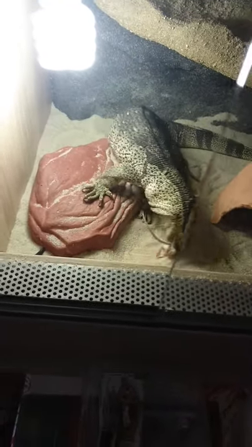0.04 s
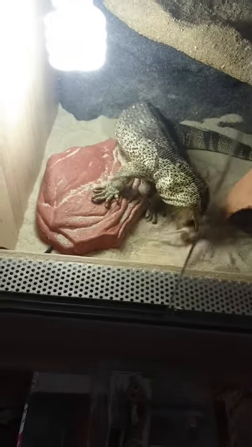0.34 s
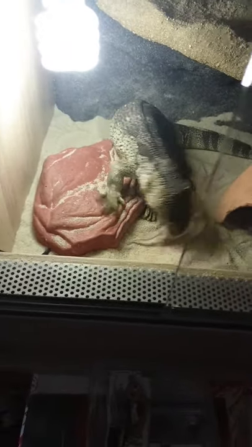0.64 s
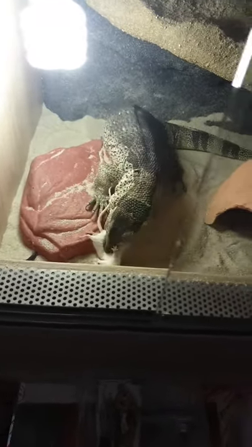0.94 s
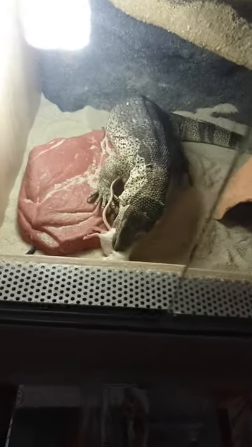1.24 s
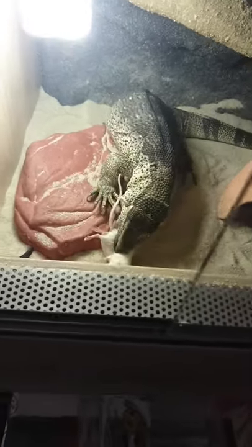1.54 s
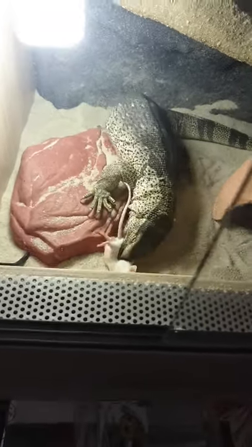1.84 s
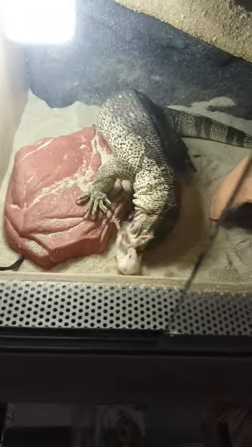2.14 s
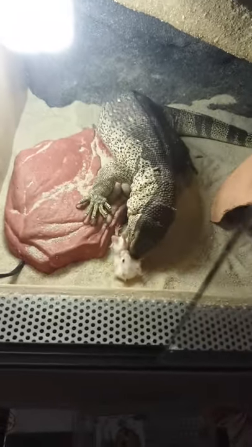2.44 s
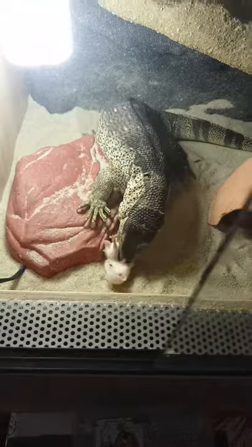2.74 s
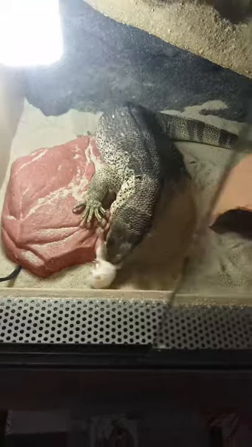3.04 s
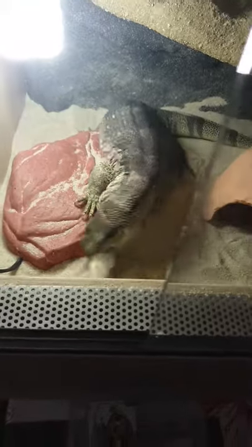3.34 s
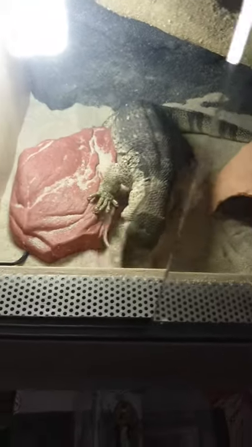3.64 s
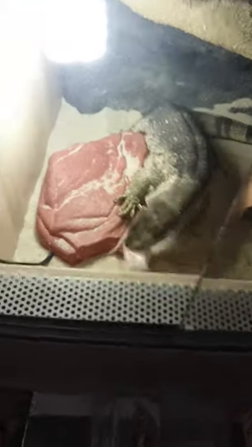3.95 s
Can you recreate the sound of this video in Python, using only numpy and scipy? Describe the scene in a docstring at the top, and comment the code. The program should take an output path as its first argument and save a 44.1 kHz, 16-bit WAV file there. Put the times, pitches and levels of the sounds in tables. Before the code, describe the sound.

A mouse gives hoarse cries and high squeaks while a lizard scuffs sand in a tank.

```python
"""A sandy, glass-fronted tank: a monitor lizard holds a mouse. The mouse gives two hoarse cries and
two clear squeaks, a whistle-like tone that turns to rasp as it roughens, echoed by the close walls.
The lizard scuffs the sand, ticks its claws, bumps and rubs the tank over a low room hum.
At the end a gust-like rub buffets the right microphone port and ends in a thump."""
import sys
import numpy as np
from scipy import signal
from scipy.fft import rfft, irfft
from scipy.io import wavfile

SR = 44100
rng = np.random.default_rng(int(sys.argv[2]) if len(sys.argv) > 2 else 0)


def dump(signal):
    """Clip the signal to [-1, 1] and save it as 16-bit WAV at the path in sys.argv[1]."""
    limited = np.clip(np.atleast_2d(signal).T, -1, 1)
    pcm = np.round(limited * 32767).astype(np.int16)
    wavfile.write(sys.argv[1], SR, pcm)


N = 176400
T = np.arange(N) / SR


def from_db(db):
    """Decibels to gain."""
    return 10 ** (np.asarray(db) / 20)


def unit_rms(x):
    """Scale to rms 1."""
    return x / np.sqrt(np.mean(x ** 2) + 1e-20)


def drift(rate_hz):
    """Smooth random wander, rms 1."""
    pole = np.exp(-2 * np.pi * rate_hz / SR)
    wander = signal.lfilter([1], [1, -2 * pole, pole * pole], rng.standard_normal(N + SR))
    return unit_rms(wander[SR:])


def shaped_noise(spectrum, correlation=0.0):
    """Stereo noise, rms 1, rolling off beyond the ends of its spectrum."""
    hz, db = np.transpose(spectrum)
    log_f = np.log(np.maximum(np.arange(N // 2 + 1) * SR / N, 1))
    outside = np.maximum(np.log(hz[0]) - log_f, 0) + np.maximum(log_f - np.log(hz[-1]), 0)
    gain = from_db(np.interp(log_f, np.log(hz), db) - 20 * outside)
    mid, side = irfft(rfft(rng.standard_normal((2, N))) * gain, N)
    return unit_rms(np.sqrt(1 + correlation) * mid + np.sqrt(1 - correlation) * side * [[1], [-1]])


def band_noise(hz, width_hz):
    """Noise through two identical resonators, rms 1."""
    r = np.exp(-np.pi * width_hz / SR)
    section = [1 - r, 0, r - 1, 1, -2 * r * np.cos(2 * np.pi * hz / SR), r * r]
    return unit_rms(signal.sosfilt([section, section], rng.standard_normal(N)))


def gate(start_s, end_s, attack_s, release_s):
    """Open from start to end, linear ramps outside."""
    return np.interp(T, [start_s - attack_s, start_s, end_s, end_s + release_s], [0, 1, 1, 0])


def knocks(rows, contact_s):
    """Soft blows: each swells over the contact time and rings down at one pitch."""
    out = np.zeros(N)
    for t, hz, db, t60_s in rows:
        age_s = np.maximum(T - t, 0)
        swell = 1 - np.exp(-age_s / contact_s)
        decay = from_db(db - 60 * np.minimum(age_s / t60_s, 10))
        out += swell * decay * np.sin(2 * np.pi * hz * age_s)
    return out


# Cry contours; the yip leads into the loud squeak: t/s, f/Hz, level/dB, roughness/0-1
FIRST_RASP = [(.526, 3220, -40, 0.77), (.531, 3035, -31.5, 0.2), (.546, 2970, -37, 0.43),
              (.555, 3117, -33, 0.66), (.573, 2926, -31.5, 1.02), (.584, 2584, -40.5, 0.99),
              (.603, 2336, -41.5, 0.98)]
LONG_RASP = [(.762, 3498, -29.5, 1), (.767, 3426, -30.5, 0.97), (.774, 3500, -37.5, 1),
             (.795, 3797, -29.5, 0.7), (.802, 3870, -23, 0.077), (.814, 3870, -22, 0.081),
             (.824, 3830, -32, 1), (.843, 3813, -29.5, 0.95), (.862, 3764, -41, 0.93),
             (.905, 3880, -33, 0.79), (.912, 3650, -42, 0.52)]
SHORT_YIP = [(2.019, 3650, -35, 0.19), (2.023, 3640, -15.5, 0.18), (2.028, 3710, -28.5, 0.11)]
LOUD_SQUEAK = [(2.034, 3020, -38, .7), (2.044, 3330, -31, .6), (2.051, 4080, -28, .5),
               (2.056, 4170, -27, .45), (2.065, 3920, -23, .25), (2.084, 3748, -22, .07),
               (2.112, 3720, -20.5, .12), (2.12, 3490, -25, .55), (2.128, 3650, -25.5, .55)]
LAST_SQUEAK = [(3.473, 2717, -44, 0.88), (3.48, 2820, -35.5, 0.93), (3.487, 3515, -29, 0.22),
               (3.497, 3686, -26.5, 0.18), (3.51, 3700, -25, 0.047), (3.524, 3570, -34.5, 0.098),
               (3.535, 3502, -31.5, 0.26), (3.557, 3505, -35.5, 0.55)]
# Rasp noise spectra of the cries, as heard at the microphone: f/Hz, relative density/dB
RASP = [(700, -22), (1600, -12.5), (2100, -25), (3100, 2.5), (4600, 3), (6200, 10), (8300, -19),
        (9400, 0.5), (11300, 12.5), (12900, -1.5), (15500, 13)]
SCREECH = [(900, -21), (1350, -8.5), (2000, -15), (3000, -10.5), (3900, 0.5), (4850, -9), (5450, 6.5),
           (7000, 6), (8400, -3.5), (10200, 7.5), (12600, -6.5), (13400, 4), (15000, -1)]
# Cries: contour, rasp spectrum, harmonic gains/dB, half-harmonic gain/dB, rasp gain/dB, right lag/ms
CRIES = [(FIRST_RASP, RASP, [-4.5, -4, -14, -4, -5], -10.5, 0, 0.11),
         (LONG_RASP, SCREECH, [-8.5, -12, -16, -35], -18, -1.76, 0.08), (SHORT_YIP, RASP, [-37.5, 0, -23],
         -10, -2.5, .34), (LOUD_SQUEAK, RASP, [-14, -5.5, -3, -18], -22, -9, .34),
         (LAST_SQUEAK, RASP, [-3.5, 0.5, -12, -8], -14, 4.5, 0.0466)]


def mouse_cries():
    """Whistle-like voice: with roughness the pitch jitters, the period doubles and rasp takes over."""
    jitter_depth, shimmer_db, rattle_db, right_db = .055, 4, 3, -6.8
    jitter, shimmer = drift(rate_hz=500), drift(rate_hz=300)
    out = np.zeros((2, N))
    for contour, rasp_spectrum, harmonics_db, halves_db, rasp_db, lag_ms in CRIES:
        t, *columns = np.transpose(contour)
        hz, db, rough = [np.interp(T, t, column) for column in columns]
        rough = np.clip(rough, 0, 1)
        phase = 2 * np.pi * np.cumsum(hz * (1 + jitter_depth * rough * jitter)) / SR
        harmonics = sum(from_db(h) * np.sin(k * phase) for k, h in enumerate(harmonics_db, 1))
        halves = sum(np.sin((k + .5) * phase) / np.sqrt(k) for k in range(1, 4))
        tone = np.sqrt(2 * (1 - rough ** 2)) * harmonics + from_db(halves_db) * rough * halves
        tone *= from_db(shimmer_db * rough * shimmer)
        rasp = unit_rms(shaped_noise(rasp_spectrum)[0] * from_db(rattle_db * shimmer))
        envelope = from_db(db) * gate(t[0], t[-1], attack_s=.003, release_s=.008)
        cry = (tone + from_db(rasp_db) * rough * rasp) * envelope
        out += [cry, from_db(right_db) * np.interp(T - lag_ms / 1000, T, cry)]
    return out


def tank_echoes(source):
    """Close walls add a quick flutter of echoes and a short diffuse tail."""
    age_s = T[:SR // 2]
    echoes = rng.standard_normal((2, len(age_s))) * (age_s > .002)
    response = np.zeros_like(echoes)
    for db, t60_s in [(-10, .069), (-21, .28)]:  # flutter, tail
        decay = echoes * from_db(-60 * age_s / t60_s)
        response += from_db(db) * decay / np.sqrt(np.sum(decay[0] ** 2))
    return source + signal.fftconvolve(source, response, axes=1)[:, :N]


# Body shifts: peak t/s, 20 dB rise/s, 20 dB fall/s, scrape level/dB, grit level/dB
SCUFFS = [(.03, 0.93, 0.73, -69, -57), (0.355, 0.025, 0.099, -41.5, -42.5),
          (.36, 0.16, 0.072, -60.5, -43.5), (.575, 0.16, 0.15, -60, -51.5), (.68, 0.23, 0.34, -80, -55.5),
          (.735, 0.05, 0.11, -54.5, -67), (0.789, 0.29, 0.23, -56, -48), (1.721, 0.13, 0.17, -63.5, -59),
          (1.97, 0.43, 0.53, -63, -57), (2.14, 0.17, 0.051, -59.5, -51), (3.121, 0.62, 0.51, -73.5, -66),
          (3.363, 0.056, 0.26, -49.5, -47), (3.438, 0.075, 0.12, -48.5, -56),
          (3.583, 0.045, 0.068, -51, -47), (3.77, 0.66, 0.82, -71.5, -60.5)]
# Sharp ticks: t/s, level/dB
TICKS = [(.479, -43), (1.449, -60), (1.824, -53.5), (1.846, -48.5), (2.201, -52), (3.292, -52),
         (3.966, -54)]
# Sand spectra: f/Hz, relative density/dB
SCRAPE_SPECTRUM = [(100, -11), (200, 20), (330, 5.5), (700, 6), (1100, -1.5), (1700, -3), (2400, -3),
                   (4000, -1), (8000, -56)]
GRIT_SPECTRUM = [(1500, -27.5), (3000, -9.5), (5000, 2), (6800, 7.5), (8700, -9.5), (12000, 1.5),
                 (15500, 3.5)]


def sand_scuffs():
    """Each body shift gives a dull scrape and grainy hiss; brief bursts sound as ticks."""
    tick_t60_s, grain_db = .07, 1.5
    scrape_power, grit_power = np.zeros(N), np.zeros(N)
    for t, rise_s, fall_s, scrape_db, grit_db in SCUFFS:
        shape_db = -20 * np.minimum(np.maximum((t - T) / rise_s, (T - t) / fall_s), 10)
        scrape_power += from_db(scrape_db + shape_db) ** 2
        grit_power += from_db(grit_db + shape_db) ** 2
    for t, db in TICKS:
        grit_power += (T >= t) * from_db(db - 60 * np.clip((T - t) / tick_t60_s, 0, 2)) ** 2
    grains = from_db(grain_db * drift(rate_hz=252))
    scrape = shaped_noise(SCRAPE_SPECTRUM, correlation=.232) * from_db([[0], [-2]])
    grit = shaped_noise(GRIT_SPECTRUM, correlation=.05) * from_db([[0], [-4]])
    return grains * (np.sqrt(scrape_power) * scrape + np.sqrt(grit_power) * grit)


# Tank bumps: t/s, f/Hz, level/dB, T60/s
BUMPS = [(.347, 713, -41, 0.12), (.354, 453, -46.5, 0.2), (.722, 178, -30, 0.082), (.728, 216.3, -38, 0.28),
         (1.68, 218, -45.5, 0.2), (1.897, 880, -53, 0.066), (2.084, 525, -45.5, 0.078),
         (2.122, 226, -38, 0.024), (2.124, 557, -33, 0.01), (2.157, 522, -37.5, 0.047)]


def wall_contact():
    """The lizard bumps the tank; its skin stutters briefly along the wall."""
    rub_envelope = from_db(-58) * gate(1.378, 1.485, attack_s=.008, release_s=.03)
    return knocks(BUMPS, contact_s=.0018) + rub_envelope * band_noise(hz=515, width_hz=120)


# Rub envelope, before clipping: t/s, level/dB
PORT_RUB = [(3.66, -71.5), (3.74, -47.5), (3.776, -42.5), (3.804, -35.5), (3.817, -24.5), (3.848, -13.5),
            (3.874, -17), (3.895, -39), (3.939, -40), (3.953, -49.5), (4.0, -56)]
# Turbulence spectrum: f/Hz, relative density/dB
BUFFET_SPECTRUM = [(30, -8), (55, -1), (85, -6), (130, 2), (300, 0), (500, -1), (850, -6), (1200, -11),
                   (2100, -26), (8470, -55), (15000, -53)]
# Port knocks, before clipping: t/s, f/Hz, level/dB, T60/s
PORT_THUMPS = [(3.766, 73.5, -25.5, 0.17), (3.893, 78, -12.5, 0.14), (3.907, 370, -2, 0.016),
               (3.9095, 710, 4, 0.004), (3.913, 54.3, -1.5, 0.053)]


def port_buffet():
    """A rub on the right port: turbulent rumble, a click and thumps, peaks rounded by overload."""
    ceiling, left_db = .55, -48
    t, db = np.transpose(PORT_RUB)
    rub = shaped_noise(BUFFET_SPECTRUM)[0] * from_db(np.interp(T, t, db)) * (T > t[0])
    click_envelope = from_db(-35) * gate(3.795, 3.795, attack_s=.0015, release_s=.003)
    click = click_envelope * band_noise(hz=4230, width_hz=2400)
    pressure = rub + click - knocks(PORT_THUMPS, contact_s=.001)
    return ceiling * np.tanh(pressure / ceiling) * from_db([[left_db], [0]])


# Room resonances: f/Hz, width/Hz, level/dB
ROOM_MODES = [(103.5, 4.2, -69), (227, 40, -68)]
# Room noise spectra: f/Hz, relative density/dB
RUMBLE_SPECTRUM = [(25, -9.5), (50, 5.5), (105, -0.5), (140, -5), (230, -4.5), (330, -24), (530, -20),
                   (1000, -33), (3000, -36.5)]
HISS_SPECTRUM = [(1500, -11), (4500, -6.5), (5500, -5), (6700, 10.5), (7600, -3.5), (8800, -29),
                 (11500, -6), (15500, -11.5)]


def room_tone():
    """Two humming resonances, low rumble and a thin hiss, mostly left."""
    hum = sum(from_db(db) * band_noise(hz, width_hz) for hz, width_hz, db in ROOM_MODES)
    rumble = from_db(-60.5) * shaped_noise(RUMBLE_SPECTRUM, correlation=.73)
    hiss = from_db([[-69.5], [-79]]) * shaped_noise(HISS_SPECTRUM)
    return hum + rumble + hiss


def scene():
    """Stereo sum; only the cries echo."""
    return tank_echoes(mouse_cries()) + sand_scuffs() + wall_contact() + port_buffet() + room_tone()


def record(dry):
    """Steep elliptic low-pass."""
    cutoff_hz = 15450
    return signal.sosfilt(signal.ellip(10, .2, 80, cutoff_hz, fs=SR, output="sos"), dry)


dry = scene()
out = record(dry)
dump(out)
```